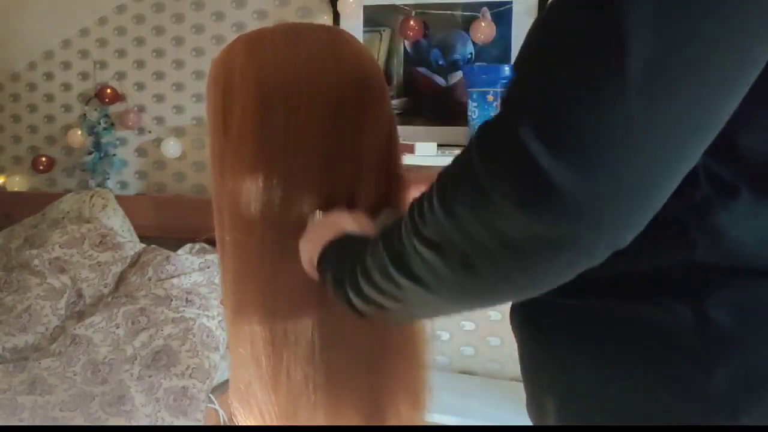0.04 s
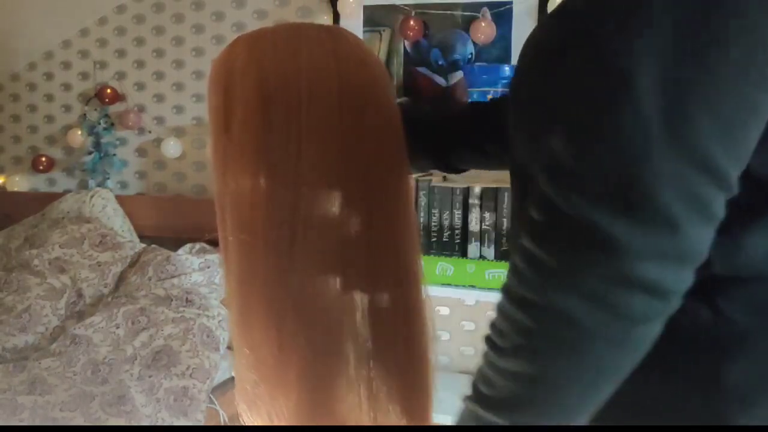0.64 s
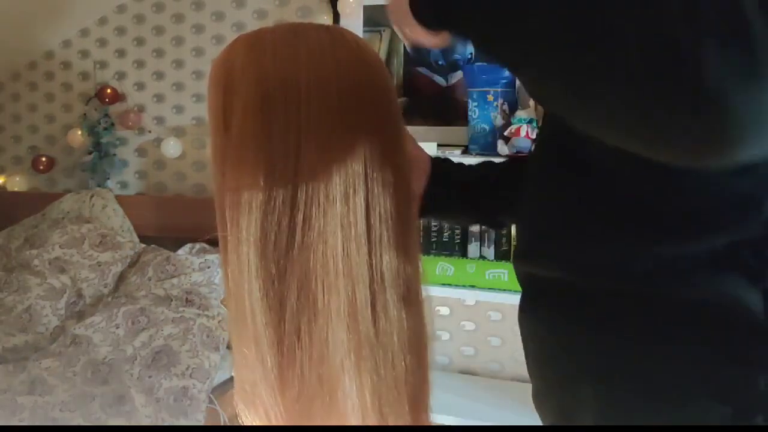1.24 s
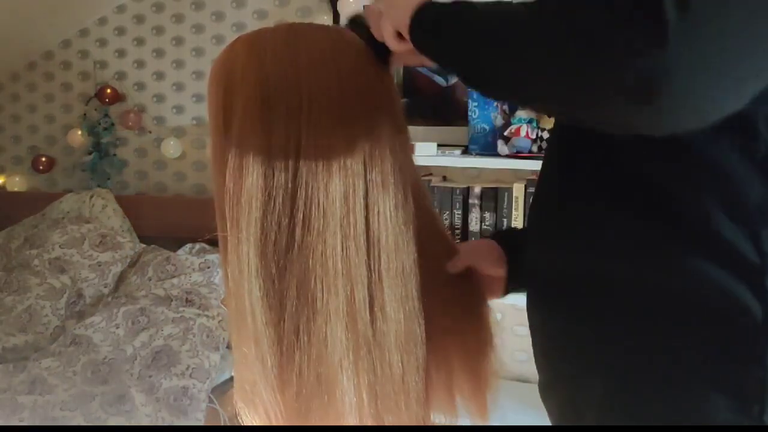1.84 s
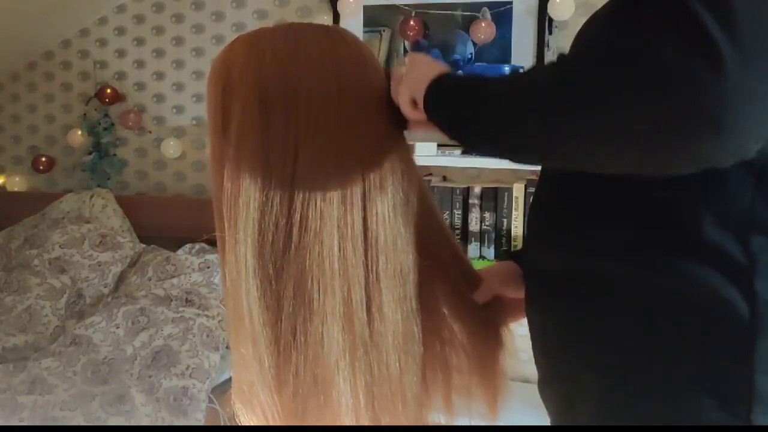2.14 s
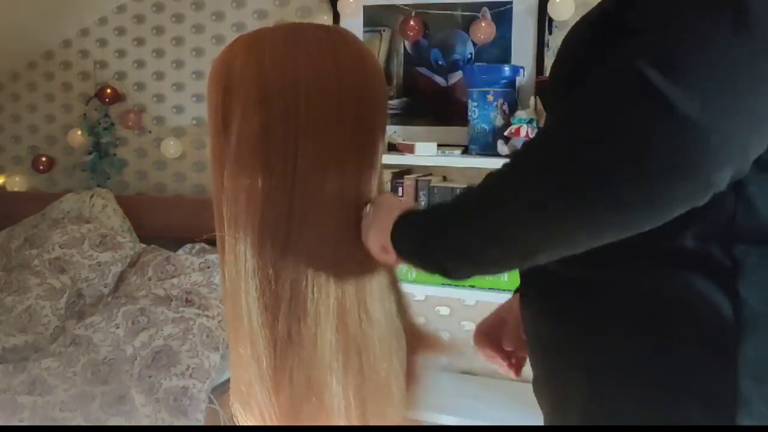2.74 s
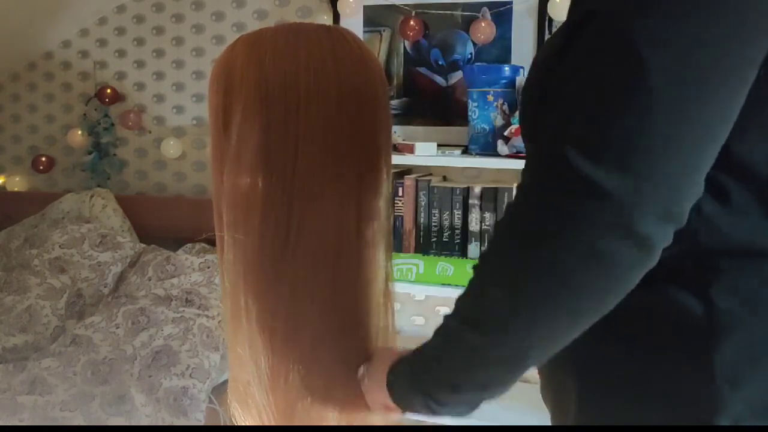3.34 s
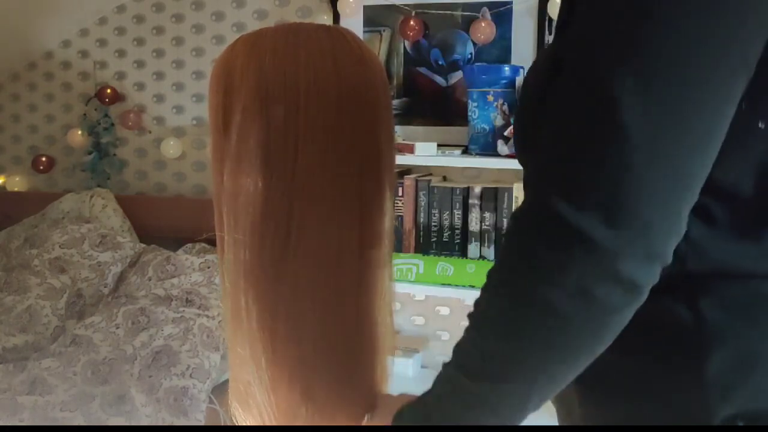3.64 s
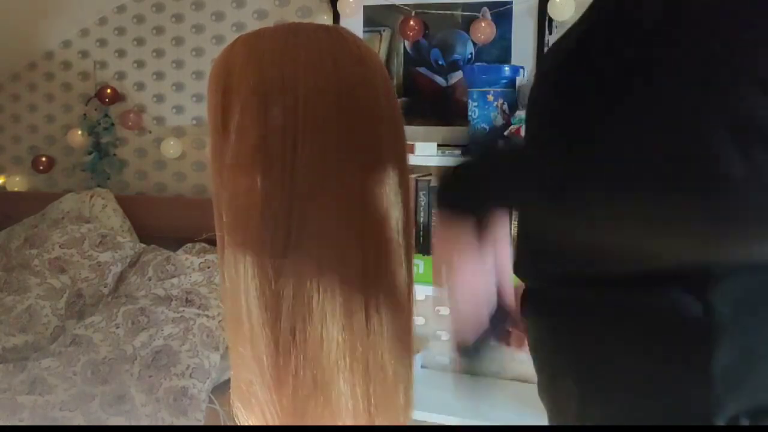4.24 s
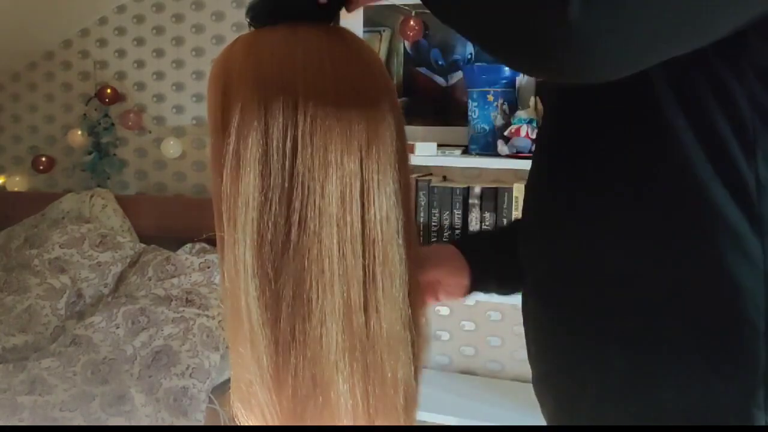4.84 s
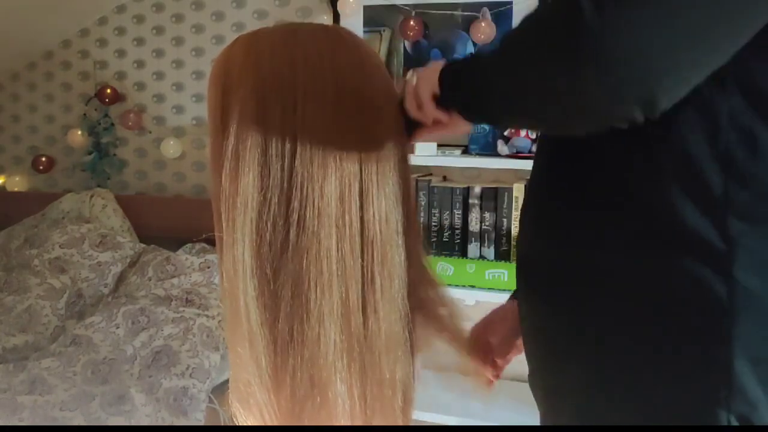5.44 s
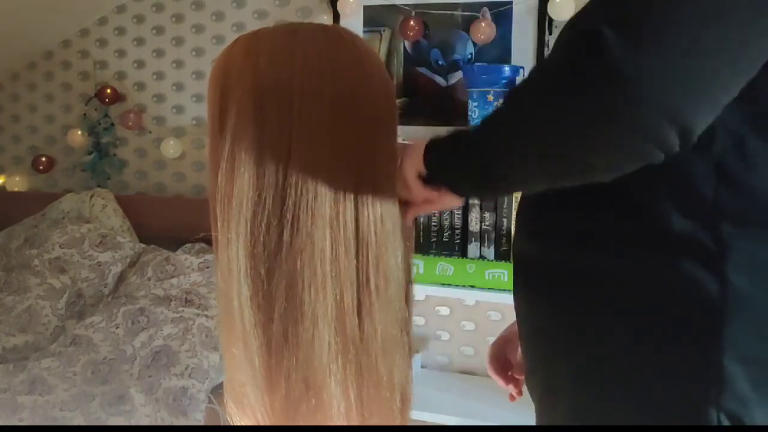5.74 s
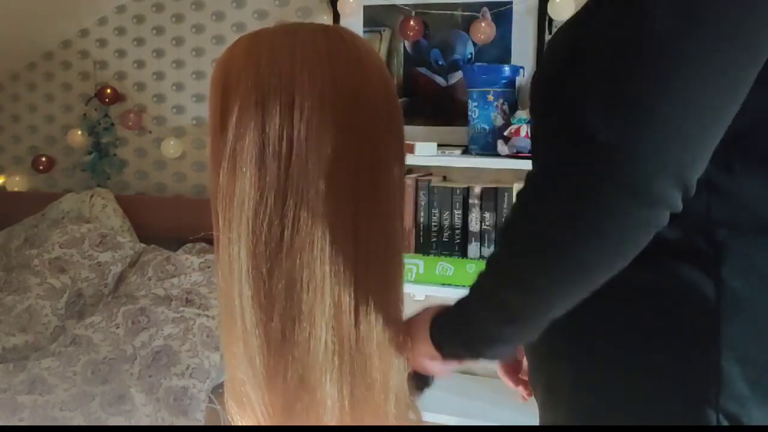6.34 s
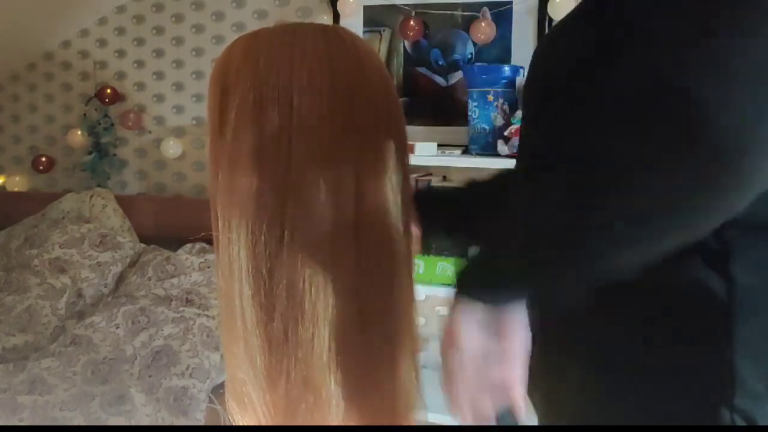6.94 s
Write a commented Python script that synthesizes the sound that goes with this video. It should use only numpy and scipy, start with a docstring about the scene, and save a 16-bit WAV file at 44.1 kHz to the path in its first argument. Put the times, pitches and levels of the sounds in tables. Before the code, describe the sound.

In a quiet bedroom, a plastic brush is pulled slowly through long hair three times, heard from close by. The first stroke is a short dry hiss with sharp bristle clicks. The next two begin with a softer scratch over the scalp and tiny hair snaps, then hiss louder toward the ends as bristles catch and flick back. A sleeve rustles faintly between strokes over a low room hush.

```python
"""In a quiet bedroom, a plastic brush is drawn slowly through long hair, three times.
On top of the head the bristles scratch the scalp; further down the strands hiss past them,
louder toward the ends. Bristles catch and flick back, single hairs snap free,
and a sleeve rustles as the arm goes up again."""
import sys
import numpy as np
from scipy import signal
from scipy.fft import rfft, irfft, next_fast_len
from scipy.io import wavfile
from scipy.ndimage import uniform_filter1d

SR = 44100
rng = np.random.default_rng(int(sys.argv[2]) if len(sys.argv) > 2 else 0)


def unload_audio(sound):
    """Save the sound as a 16-bit wav file, at the path given as the first command line argument."""
    columns = np.transpose(np.atleast_2d(sound))
    # keep every value between -1 and 1, then stretch to whole-number steps
    steps = np.round(np.clip(columns, -1, 1) * 32767)
    wavfile.write(sys.argv[1], SR, steps.astype(np.int16))


N = 317520
TIME = np.arange(N) / SR

# Strokes down the hair; the angle of the brush sets the mix of sounds. (start [s], pull grows from [s],
# full pull at [s], end [s], fade-out [s], first pull [dB], full pull [dB], rub [dB], thrum [dB],
# pad ring [dB], extra ring at the hair ends [dB])
STROKES = [(-0.05, 0.1, 0.65, 0.728, 0.043, -3.5, 7, -56.5, -63, -54.5, -1),
           (2.496, 2.58, 3.2, 3.948, 0.024, -8, 0.2, -55, -65.5, -57, 0.0),
           (5.57, 6.06, 6.39, 6.785, 0.054, -5, 1.73, -54, -64.5, -55.5, 6)]
HISS_DB = -47  # at a pull of 0 dB
RUB_FOLLOWS, THRUM_FOLLOWS, PAD_FOLLOWS = 0.74, 0.7, 0.83  # dB gained per dB of pull
GRIP_PER_S = 14  # how often the uneven grip on the hair changes
# The bristle pad bumps softly over the back: (time [s], boost [dB])
PAD_BUMPS = [(0.37, 4.5), (3.36, 2.5), (3.8, 5.5), (5.99, 7.5), (6.62, 5.5)]
# The brush crosses the crown, the top of the head: (start [s], end [s], level [dB])
CROWN_PASSES = [(1.87, 2.568, -55), (5.029, 5.634, -52.5)]
PRESS_DB = 3  # it presses harder as it rounds the back of the head
# Bristles flick back from a knot: (time [s], level [dB], pitch [Hz], rattle time [s], added crack [dB])
BRISTLE_FLICKS = [(0.162, -32.5, 2730, 0.006, 0), (0.335, -27, 1740, 0.017, 0),
                  (0.35, -32, 2500, 0.014, -7), (0.403, -39, 2640, 0.012, -11),
                  (0.749, -44, 2600, 0.014, -18), (1.711, -45, 3850, 0.009, -1),
                  (2.019, -39, 3770, 0.016, -11), (2.382, -39.5, 1660, 0.01, -13),
                  (3.629, -31.5, 1490, 0.016, -18), (3.708, -29.5, 2580, 0.016, -9),
                  (3.747, -30, 3300, 0.025, -20), (3.762, -30, 2630, 0.01, -19.5),
                  (3.78, -20, 1530, 0.007, -29), (3.847, -27, 3360, 0.011, -16),
                  (4.02, -47, 2710, 0.012, -13), (4.979, -43.5, 2100, 0.08, -13),
                  (5.328, -39, 2400, 0.02, -13), (5.407, -37, 1060, 0.015, -11),
                  (5.532, -40, 1730, 0.014, -11), (5.551, -24.5, 1620, 0.007, -2),
                  (5.863, -39, 2550, 0.011, -13), (5.985, -35.5, 2700, 0.02, -15),
                  (6.033, -29, 2340, 0.007, -6), (6.478, -35, 2530, 0.0077, -13)]
# Bristles chatter in a short run of slips: (time [s], relative level [dB], pitch [Hz])
BRISTLE_CHATTERS = [(1.759, -48.5, 1820), (1.827, -46.5, 2470), (5.701, -35.5, 2020)]
# Single hairs snap free: (time [s], relative level [dB])
HAIR_SNAPS = [(2.1133, -36), (2.4527, -27), (2.4688, -28), (2.4862, -25.5), (3.9365, -31), (5.1613, -33.5),
              (5.202, -33), (5.293, -32), (5.4979, -25.5), (5.541, -26)]
# The brush lands on the head: (time [s], relative level [dB])
LANDINGS = [(4.976, -56.5)]
# Loose hair and cloth swish: (time [s], level [dB], pitch [Hz], half length [s])
BRIEF_SWISHES = [(0.8, -58, 3070, 0.016), (3.998, -58.5, 3480, 0.032), (4.449, -62, 7860, 0.016)]
# The sleeve moves with the arm: (time [s], level [dB], half length [s])
SLEEVE_MOVES = [(1.35, -66.5, 0.59), (1.334, -61, 0.091), (1.873, -63, 0.061), (4.616, -65.5, 0.13),
                (5.04, -61, 0.07), (7.08, -66, 0.11)]

# The tones at which each part rings: (pitch [Hz], width [Hz], level [dB])
BODY_RING = [(480, 360, -4.5), (1060, 570, -5.5), (1614, 263, 0.5), (1773, 310, -1), (2370, 700, -4.5),
             (3450, 520, -4), (3980, 2050, -7.5), (5480, 1750, -12), (7000, 970, -11.5), (12400, 3900, -12)]
TEETH_RING = [(1645, 280, 4.5), (2390, 140, 3), (3050, 220, -2)]
PAD_RING = [(2384, 230, -1), (2644, 226, 0), (3180, 400, -4.5)]
HOLLOW_RING = [(158, 48, -9), (400, 152, -6.5), (577, 105, 2)]  # the hollow behind the pad
SNAP_RING = [(3030, 2500, -2.5), (7340, 1600, 0.5), (13000, 2000, -3)]  # a snapping hair and its bristle

# The tone colour of each noise, from low to high: (frequency [Hz], level [dB])
HISS_COLOUR = [(1470, -71), (2500, -9), (2910, -14), (3890, -2.5), (5660, -4), (6900, 0.5), (7740, 0),
               (8480, -1), (9510, -7.5), (10300, -9), (12800, -2), (15500, -7)]
RUB_COLOUR = [(380, -14), (650, -41), (712, -7), (888, -1.5), (1120, -6.5), (1330, -4.5), (1550, -4.5),
              (2110, -3.5), (2460, -8), (2910, -4.5), (4000, -0.5), (5200, -59), (8800, -120)]
SCALP_COLOUR = [(360, -33), (620, -42), (665, -23), (785, 5), (903, -4.5), (976, 2), (1260, -4),
                (1630, 1.5), (2070, -3), (2240, 1), (2780, 2), (3120, 2), (3350, -1.5), (3880, 0),
                (5000, -17), (6500, -28), (11000, -120)]
CRACKLE_COLOUR = [(1470, -46), (2500, -35), (3100, -2), (3370, -19), (4500, -5), (6640, -0.5), (8950, -6),
                  (9950, -14.5), (12400, -4.5), (15500, -14.5)]
CLOTH_COLOUR = [(290, -17), (500, -12), (576, -24), (655, -31), (835, -1.5), (1470, -3.5), (1880, -3),
                (2880, 0.5), (15000, -8)]
ROOM_COLOUR = [(8, 24), (18, 23.5), (25, 5.5), (45, -2), (62, 0), (85, -1), (100, 1), (150, -2.5),
               (250, -2), (450, -2), (1300, -2.5), (3200, -2.5), (5000, -4), (7500, -1.5), (10000, -5.5),
               (13000, -4.5), (15500, -10)]
# How wide the room noise sounds: (frequency [Hz], sides compared with the middle [dB])
ROOM_SPREAD = [(60, -11.5), (180, -8), (550, -11), (1650, -24.5), (5000, -21), (9000, -16.5), (15000, -37)]


def hair_strokes():
    """Strands hiss past the bristles, rub along them and make the pad and its hollow ring."""
    slips = friction(per_s=4000, size_db=2.8, smooth=.62, flutter_db=.6)
    drag = friction(per_s=900, size_db=3.8, smooth=.75, flutter_db=1)
    shake = friction(per_s=1800, size_db=4, smooth=.57, flutter_db=1)
    grip = drift(GRIP_PER_S)
    hiss = unit(butter(coloured(slips, HISS_COLOUR), 3500, "high", order=4)) * from_db(HISS_DB)
    rub = butter(coloured(drag, RUB_COLOUR), 2900, "low")
    rub = unit(butter(rub, 820, "high", order=4)) * from_db(.73 * grip)
    thrum = unit(butter(ring(drag, HOLLOW_RING), 790, "low")) * from_db(1.6 * grip)
    pad = unit(butter(ring(shake, PAD_RING), [2150, 3700], "band")) * from_db(.73 * grip)
    out = pad_load() * thrum
    for stroke in STROKES:
        end = stroke[3]
        rub_db, _, pad_db, ends_db = stroke[7:]
        at_ends = swell(end - .1, half_s=.1)
        out += pull(stroke) * hiss
        out += from_db(rub_db) * pull(stroke, RUB_FOLLOWS) * rub
        out += from_db(pad_db + ends_db * at_ends) * pull(stroke, PAD_FOLLOWS) * pad
    return out


def pull(stroke, follows=1, tangle_db=-11, tug_db=5):
    """Volume over a stroke: the pull grows, a tangle stalls it, a harder tug drags the brush through."""
    start, grows, full, end, release_s, first_db, full_db = stroke[:7]
    tangle = tangle_db * swell(3.66, half_s=.051)
    tug = tug_db * swell(3.84, half_s=.071)
    pull_db = np.interp(TIME, [grows, full], [first_db, full_db]) + tangle + tug
    return contact(start, end, attack_s=.059, release_s=release_s) * from_db(follows * pull_db)


def pad_load():
    """Volume of the low sounds: they follow the pull and swell where the pad bumps over the back."""
    bumps_db = sum(db * swell(s, half_s=.034) for s, db in PAD_BUMPS)
    thrum_gain = sum(from_db(stroke[8]) * pull(stroke, THRUM_FOLLOWS) for stroke in STROKES)
    return from_db(bumps_db) * thrum_gain


def scalp_scratch():
    """Bristle tips scratch over the scalp; single teeth catch and make the brush ring."""
    slips = friction(per_s=1800, size_db=3.2, smooth=.44, flutter_db=1.48)
    catches = friction(per_s=260, size_db=2.5, smooth=.1, flutter_db=1)
    crackle = unit(butter(coloured(slips, CRACKLE_COLOUR), 2800, "high", order=4)) * from_db(-.55)
    scratch = unit(butter(coloured(slips, SCALP_COLOUR), [700, 4000], "band", order=4)) * from_db(-.5)
    teeth = unit(ring(catches, TEETH_RING)) * from_db(-3.5)
    thrum = unit(butter(ring(slips, HOLLOW_RING), 720, "low")) * from_db(-15.5)
    grip = from_db(.84 * drift(GRIP_PER_S))
    return grip * (pressure() * (crackle + scratch + teeth) + pressure(press_db=10.5) * thrum)


def pressure(press_db=PRESS_DB):
    """Volume of the bristles on the scalp: even through each pass, with one firmer press near its end."""
    gain = np.zeros(N)
    for start, end, db in CROWN_PASSES:
        press = swell(end - .07, half_s=.058)
        gain += contact(start, end, attack_s=.125, release_s=.052) * from_db(db + press_db * press)
    return gain


def bristle_flicks(recoil=.11, rattle=.24):
    """A bent bristle cracks free, hits its seat a moment later and rattles in the brush body."""
    out, t = np.zeros(N), np.arange(2048) / SR
    for s, db, pitch_hz, rattle_s, crack_db in list(BRISTLE_FLICKS) + stray_flicks():
        force = rattle * rng.standard_normal(len(t)) * fade(t, rattle_s)
        force[0] += recoil
        force[round(.0007 * SR)] += 1  # the hit on the seat
        # a stiffer, higher bristle puts little into the low tones
        thinned = butter(force, .5 * pitch_hz, "high", order=1)
        knock = brush_body(thinned, pitch_hz, width_hz=1000 + .66 * pitch_hz)
        crack = peak_one(resonance(force, hz=6500, width_hz=3800))
        add(out, s, from_db(db) * (knock + from_db(crack_db) * crack))
    return out


def stray_flicks(per_s=6, pitch_hz=2200, rattle_s=.012, crack_db=-13):
    """Bristles also flick by chance, as strongly as they are rubbing: more rows like BRISTLE_FLICKS."""
    rubbing = sum(pull(stroke, RUB_FOLLOWS) for stroke in STROKES)
    strength = from_db(-43.5) * rubbing + from_db(12.5) * pressure()
    starts = np.flatnonzero((rng.random(N) < per_s / SR) & (strength > 0))
    rows = []
    for i in starts:
        db = 20 * np.log10(strength[i]) + rng.normal(0, 1.5)
        octaves = rng.normal(0, .3)
        rows.append((i / SR, db, pitch_hz * 2 ** octaves, rattle_s, crack_db))
    return rows


def bristle_chatters(slips_per_s=980, fade_s=.052, boost_db=2):
    """A bristle sticks and slips 14 times in a quick run that dies away."""
    out = np.zeros(N)
    for s, db, pitch_hz in BRISTLE_CHATTERS:
        gaps = rng.uniform(.95, 1.1, size=14) / slips_per_s
        slip_times = np.cumsum(gaps) - gaps[0]
        uneven = from_db(rng.normal(0, 1, len(gaps)))
        force = np.zeros(SR // 10)
        force[(slip_times * SR).astype(int)] = fade(slip_times, fade_s) * uneven
        add(out, s, from_db(db + boost_db) * brush_body(force, pitch_hz, width_hz=1800))
    return out


def brush_body(force, pitch_hz, width_hz):
    """The plastic body rings, most of all near the pitch of the bristle that shakes it."""
    return peak_one(resonance(ring(force, BODY_RING), pitch_hz, width_hz))


def hair_snaps(fade_s=.009, trim_db=-2.5):
    """A single hair slips off a bristle tip with a bright, very short crack."""
    out, t = np.zeros(N), np.arange(1024) / SR
    for s, db in HAIR_SNAPS:
        burst = rng.standard_normal(len(t)) * fade(t, fade_s)
        add(out, s, from_db(db + trim_db) * peak_one(ring(burst, SNAP_RING)))
    return out


def landing_thuds(knock_hz=165, boom_hz=63, landing_boost_db=5):
    """The head gives a soft knock as the brush lands; a low room resonance thuds with it, and booms as the
    brush pulls and presses."""
    out, t = np.zeros(N), np.arange(SR) / SR
    knock = fade(t, .11) * np.sin(2 * np.pi * knock_hz * t)
    thud = from_db(-6) * fade(t, .76) * np.sin(2 * np.pi * boom_hz * t)
    soft_start = 1 - np.exp(-t / .0016)
    for s, db in LANDINGS:
        add(out, s, from_db(db + landing_boost_db) * (knock + thud) * soft_start)
    load = from_db(-5.5) * pad_load() + from_db(-24) * pressure()
    rumble = resonance(rng.standard_normal(N), boom_hz, width_hz=12)
    boom = unit(butter(rumble, [44, 74], "band"))
    return out + uniform_filter1d(load, SR // 8) * boom


def sleeve():
    """Soft cloth slides over itself while the arm is lifted."""
    slips = friction(per_s=880, size_db=-4, smooth=.88, flutter_db=1.5)
    power = sum((from_db(db) * swell(s, half_s)) ** 2 for s, db, half_s in SLEEVE_MOVES)
    return unit(coloured(slips, CLOTH_COLOUR)) * np.sqrt(power)


def swishes():
    """Freed hair ends fall back against the rest; a cuff skims past."""
    rustle = friction(per_s=2500, size_db=-2, smooth=.74, flutter_db=5.5)
    return sum(from_db(db) * swell(s, half_s) * unit(resonance(rustle, pitch_hz, width_hz=1700))
               for s, db, pitch_hz, half_s in BRIEF_SWISHES)


def bedroom_echo(x, fade_s=.19, middle_db=-17, side_db=-39):
    """A furnished room adds a short, dull echo, nearly alike on the left and right."""
    t = np.arange(SR // 3) / SR
    noise = butter(rng.standard_normal((2, len(t))), 14000, "low", order=1)
    tails = noise * fade(t, fade_s) * (t > .004)
    middle, side = [signal.fftconvolve(x, tail / np.linalg.norm(tail))[:N] for tail in tails]
    return x + from_db(middle_db) * middle + from_db(side_db) * side * [[1], [-1]]


def room_noise(level_db=-60.5):
    """The steady hush of the room, with faint microphone hiss."""
    middle, side = [unit(coloured(white, ROOM_COLOUR)) for white in rng.standard_normal((2, N))]
    return from_db(level_db) * (middle + coloured(side, ROOM_SPREAD) * [[1], [-1]])


def friction(per_s, size_db, smooth, flutter_db):
    """Tiny slips of uneven size over the rush of countless strands; `smooth` is the rush's share."""
    slipping = rng.random(N) < per_s / SR
    sizes = from_db(size_db * np.minimum(rng.exponential(1, N), 4))
    slips = unit(slipping * sizes * rng.choice([-1, 1], N))
    rush = rng.standard_normal(N)
    flutter = from_db(flutter_db * drift(70))
    return (np.sqrt(1 - smooth) * slips + np.sqrt(smooth) * rush) * flutter


def drift(per_s):
    """A random wander around 0 that takes a new turn `per_s` times a second."""
    points = rng.standard_normal(4096)
    return unit(np.interp(TIME * per_s, np.arange(4096), points))


def contact(start, end, attack_s, release_s):
    """How deep the bristles are in the hair: rises from 0 to 1, holds, then falls back."""
    return np.clip(np.minimum((TIME - start) / attack_s, (end - TIME) / release_s), 0, 1)


def swell(s, half_s):
    """A bell-shaped rise and fall that reaches 1 at time s."""
    return np.exp(-((TIME - s) / half_s) ** 2)


def fade(t, fade_s):
    """Die away by 60 dB in `fade_s` seconds."""
    return from_db(-60 * t / fade_s)


def ring(x, tones):
    """Ring several tones at once, with every second one flipped in sign."""
    return sum((-1) ** k * from_db(db) * resonance(x, hz, width)
               for k, (hz, width, db) in enumerate(tones))


def resonance(x, hz, width_hz):
    """Ring at one pitch; a smaller width rings longer."""
    r = np.exp(-np.pi * width_hz / SR)
    feedback = [1, -2 * r * np.cos(2 * np.pi * hz / SR), r * r]
    return signal.lfilter(np.array([1, 0, -1]) * (1 - r * r) / 2, feedback, x)


def coloured(x, colour):
    """Turn each frequency up or down along a curve drawn through a colour table."""
    size = next_fast_len(N + 4096)
    hz, db = np.transpose(colour)
    all_hz = np.maximum(np.fft.rfftfreq(size, 1 / SR), 1)
    curve_db = np.interp(np.log(all_hz), np.log(hz), db)
    return irfft(rfft(x, size) * from_db(curve_db), size)[:N]


def butter(x, edge_hz, kind, order=2):
    """Keep the lows, the highs or a band; a higher order cuts more sharply."""
    return signal.sosfilt(signal.butter(order, edge_hz, kind, fs=SR, output="sos"), x)


def unit(x):
    """Scale to an average strength (rms) of 1."""
    return x / np.sqrt(np.mean(x ** 2) + 1e-20)


def peak_one(x):
    """Scale so the biggest peak is 1."""
    return x / np.abs(x).max()


def from_db(db):
    """Turn decibels into a number to multiply by."""
    return 10 ** (np.asarray(db) / 20)


def add(out, s, sound):
    """Mix a short sound in at time s."""
    start = round(s * SR)
    out[start:start + len(sound)] += sound[:N - start]


def scene():
    """All the sounds of the brushing, together in the room."""
    brushing = hair_strokes() + scalp_scratch()
    clicks = bristle_flicks() + bristle_chatters() + hair_snaps()
    return bedroom_echo(brushing + clicks + landing_thuds() + sleeve() + swishes()) + room_noise()


def record(dry):
    """Drop the deepest rumble and cut the very highest sounds off steeply."""
    top_cut = signal.ellip(12, .1, 80, 15650, fs=SR, output="sos")
    return signal.sosfilt(top_cut, butter(dry, 24, "high"))


dry = scene()
out = record(dry)
unload_audio(out)
```